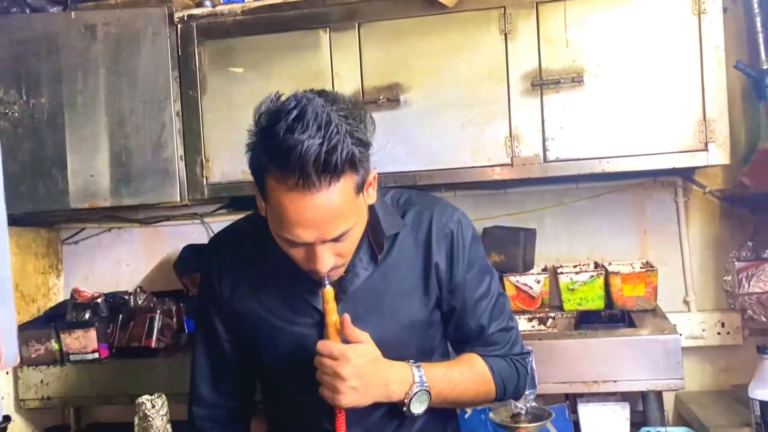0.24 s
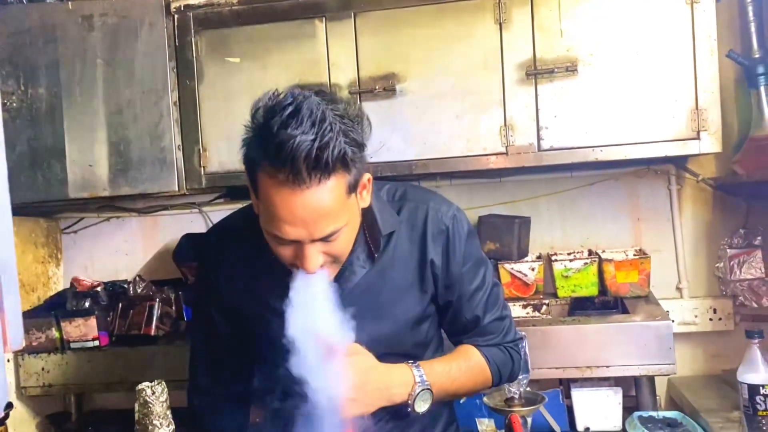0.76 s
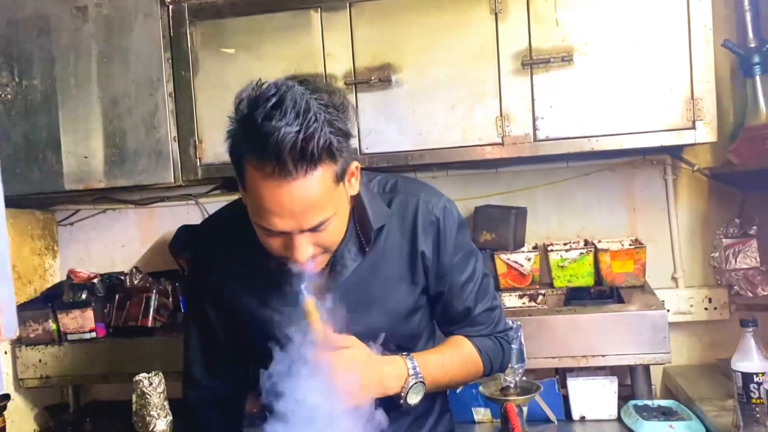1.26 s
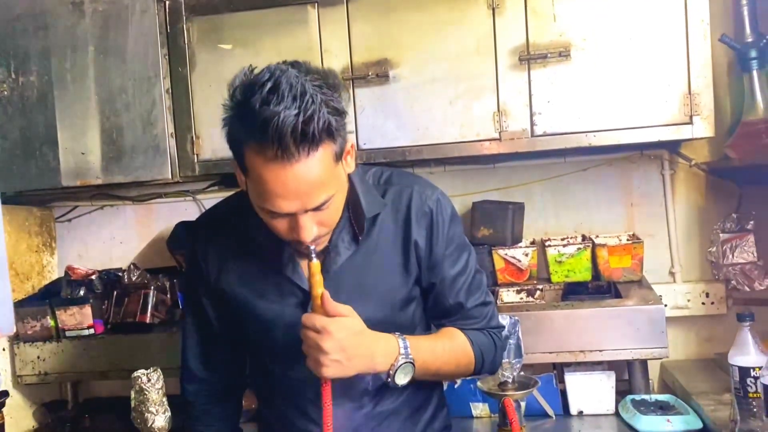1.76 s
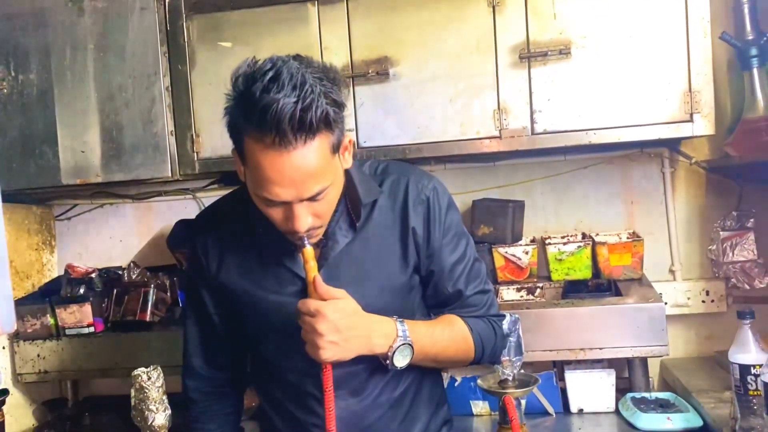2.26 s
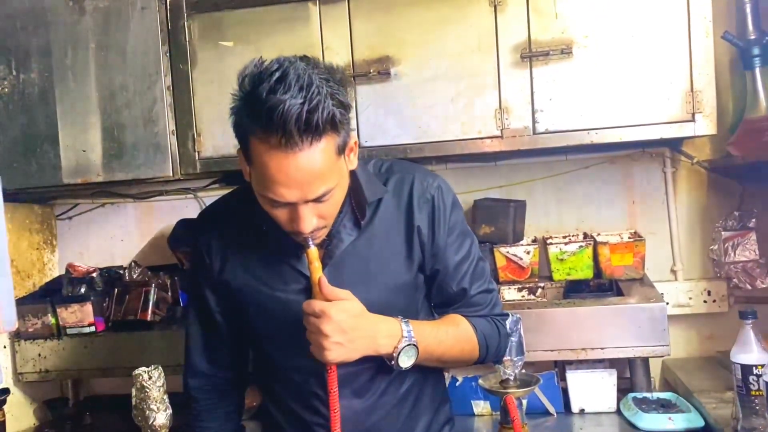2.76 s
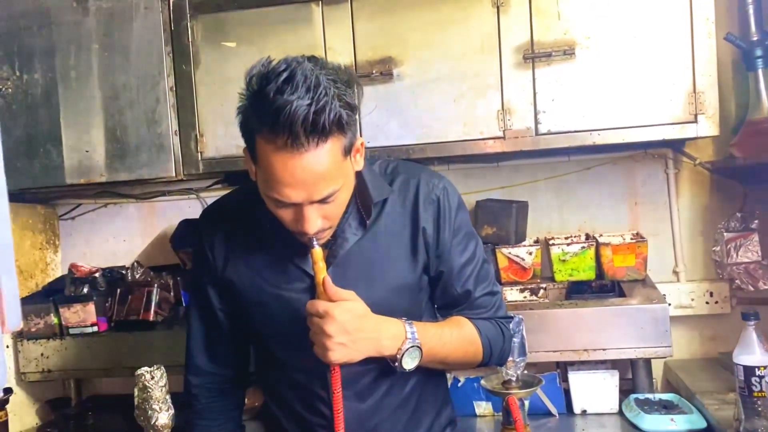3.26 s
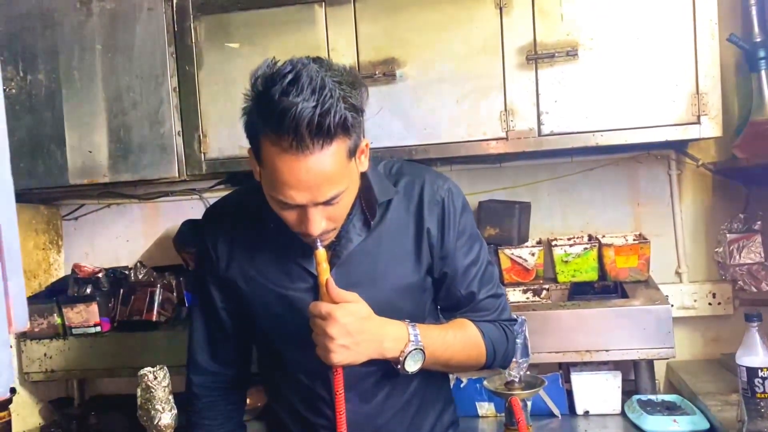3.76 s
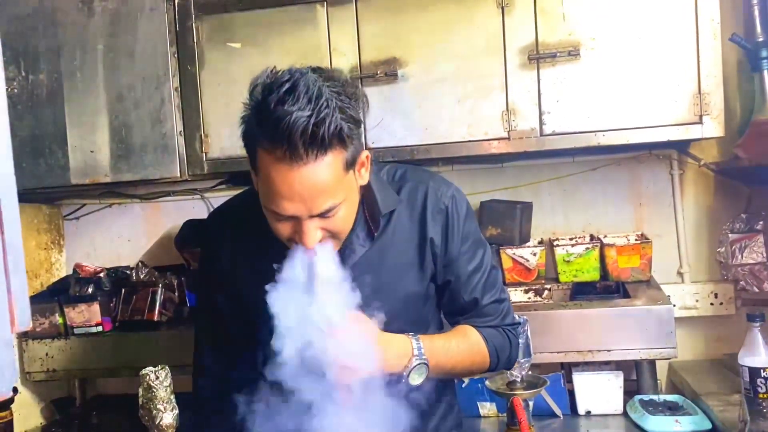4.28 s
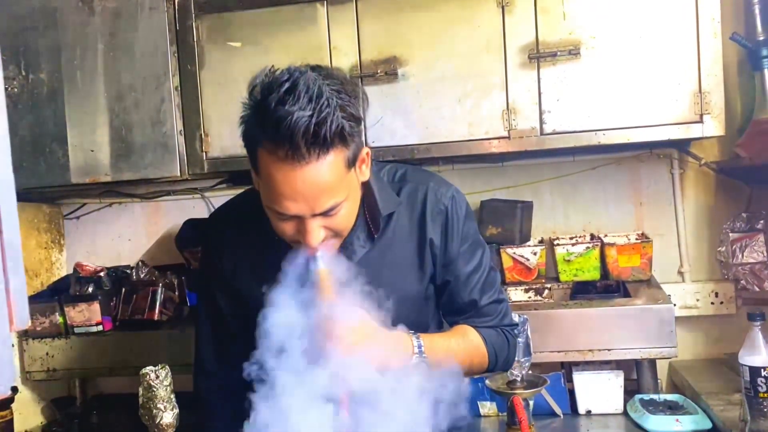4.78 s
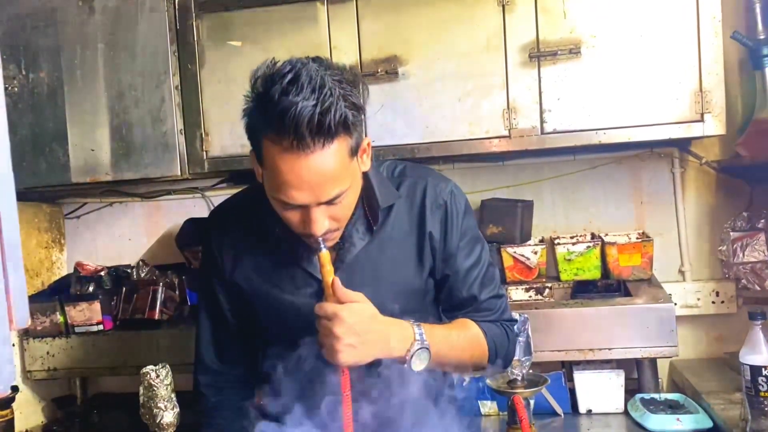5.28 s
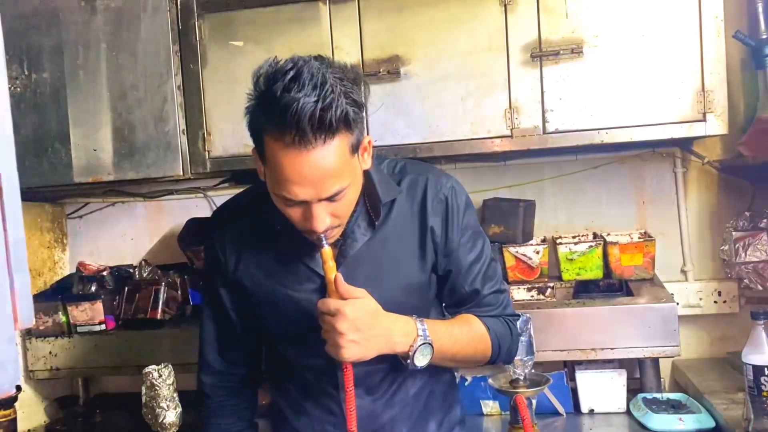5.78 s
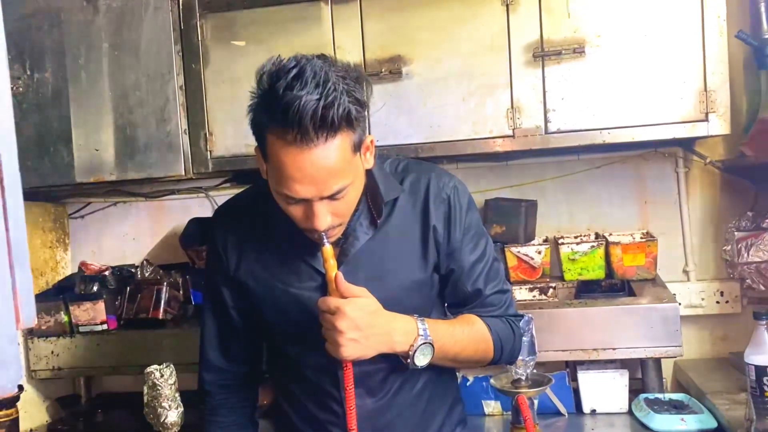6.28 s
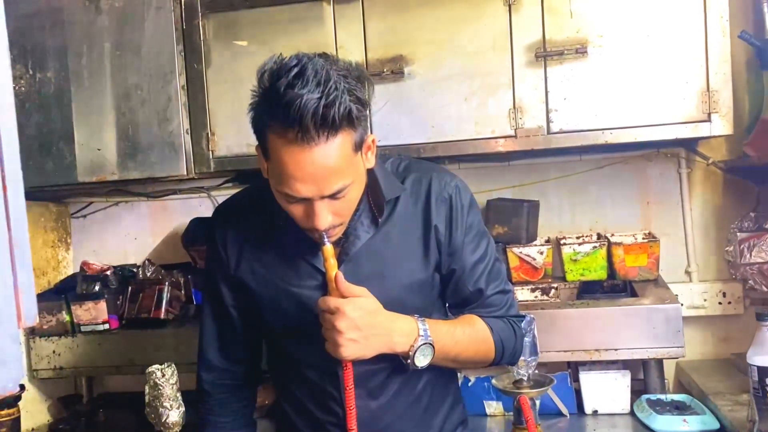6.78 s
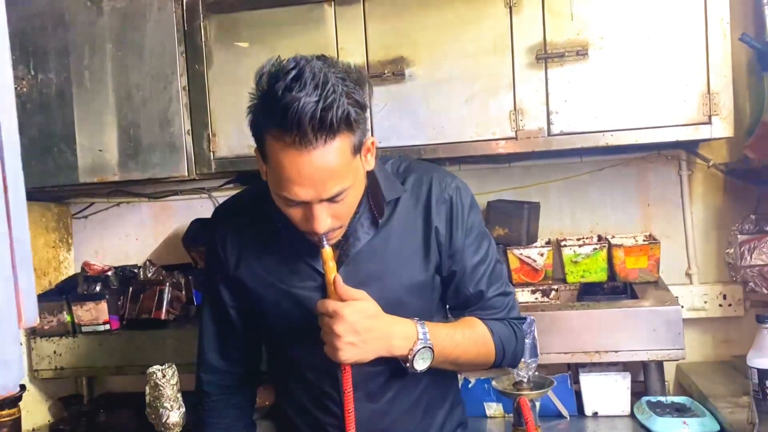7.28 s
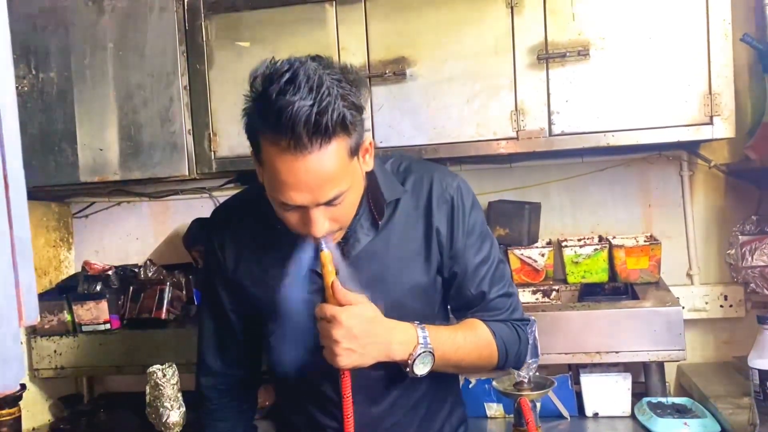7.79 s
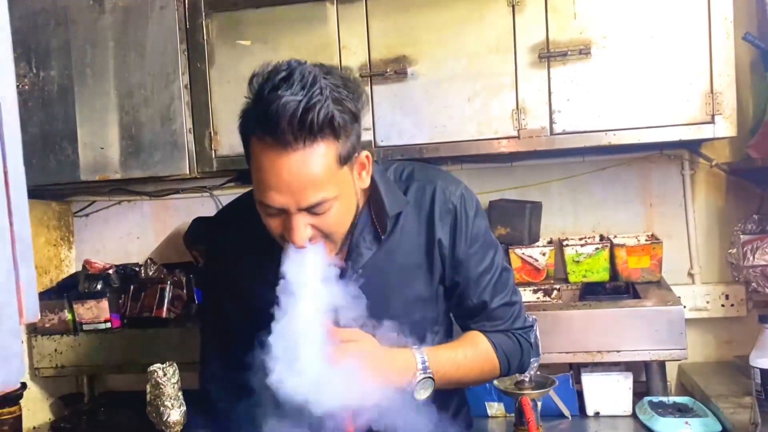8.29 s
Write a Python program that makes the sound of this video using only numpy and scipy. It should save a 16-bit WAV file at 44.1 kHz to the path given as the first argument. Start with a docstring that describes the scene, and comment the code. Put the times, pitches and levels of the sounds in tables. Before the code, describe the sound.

A water pipe is heard close up in a small kitchen, in stereo with a short, diffuse echo. From 0 to 0.5 s the end of a draw gurgles: quick hollow glugs, strongest at first, then weakening. Until about 1.8 s only machinery is left: a low mains-like hum wavering in strength, a deeper motor tone, rumble and a soft fan rush. A tiny airy spurt comes just before the second draw, whose gulps run from 2.0 to 3.8 s, irregular, rounded and wet, more widely spaced towards the end, with faint hiss. The drone stands alone again until 5.2 s. The third draw is longest and densest, about fifteen gulps a second, bubbling with small rising pops and a breathy airflow hiss that fades; a small hard tick lands near 6.26 s. Gulps weaken towards 7.8 s and stop. Hum and fan continue to 8.6 s, with one barely audible tick near 8.4 s.

```python
"""Gurgling water pipe in a kitchen

A water pipe gurgles in a small kitchen during three draws. Gulps of smoke break off the submerged stem:
short volleys of pressure jolts set its air column ringing. Loose bubbles are short rising tones, ticks are
clicks into short resonances, and the hiss of air is faint coloured noise. Machinery drones all along:
a wavering hum, a motor tone and a low tone (sines), rumble and fan (noise). The left side hears later."""
import sys
import numpy as np
from scipy import signal
from scipy.fft import rfft, irfft, next_fast_len
from scipy.io import wavfile

SR = 44100
rng = np.random.default_rng(int(sys.argv[2]) if len(sys.argv) > 2 else 0)


def dump(signal):
    """Clip the signal to [-1, 1] and save it as 16-bit WAV at the path in sys.argv[1]."""
    limited = np.clip(np.atleast_2d(signal).T, -1, 1)
    pcm = np.round(limited * 32767).astype(np.int16)
    wavfile.write(sys.argv[1], SR, pcm)


N = 376589

# the clear gulps leaving the stem: (time [s], level [dB], lift of the modes near 1.2 kHz [dB],
# near 1.9 kHz [dB], near 2.8 kHz [dB], bubble pitch [Hz], strongest mode near 1.2 kHz [Hz],
# strongest mode near 1.9 kHz [Hz], delay of the bubble's song, which also sets the volley's swell [s])
GULPS = [(0.022, -7.5, 7, 7.5, -13, 538, 1246, 1857.0, 0.012),
         (0.098, -7.5, -2.5, -5, -12, 508, 1303.0, 1863.0, 0.016),
         (0.163, -17.5, 10, 0, -10, 506, 1141.0, 2008.0, 0.012),
         (0.262, -17.5, 3, -21, -14, 623, 1007.0, 1475.0, 0.01),
         (0.312, -12, -7, -17, -15, 656, 1330.0, 1534.0, 0.0019),
         (0.354, -13.5, -4, -6, -7, 638, 1020, 1486.0, 0.008),
         (0.425, -13.5, -9, -1.0, -4, 559, 1020, 1642.0, 0.0098),
         (0.474, -18.5, -12, -19.5, -12, 453, 1044.0, 1820.0, 0.0035),
         (2.031, -14.5, 2.5, -2.5, -8.5, 558, 991.0, 1669.0, 0.0087),
         (2.084, -4.5, 6, 1.5, -0.5, 564.6, 1314.0, 1642.0, 0.014),
         (2.146, -14.5, -0.5, -4, -5, 568.0, 1015, 1637.0, 0.0018),
         (2.186, -9.5, 3, 5, 6.5, 547, 1344, 1642.0, 0.014),
         (2.242, -23.5, 4, -2.5, 10, 573, 1297.0, 1820.0, 0.019),
         (2.374, -19.5, -4, -1, 4, 503.0, 1147.0, 1637.0, 0.003),
         (2.506, -12, 7, -2.5, -14, 499, 1320, 1642.0, 0.0092),
         (2.62, -15.5, -2, -1, -8, 532, 1157.0, 1647.0, 0.0091),
         (2.706, -12.5, -1, -15, -5, 545, 1222.0, 1631.0, 0.012),
         (2.741, -18, 7, 8, 8.0, 476, 1030, 1642.0, 0.0017),
         (2.805, -15, 3.5, 4, 0, 457, 1012.0, 1637.0, 0.0069),
         (2.863, -22.5, -16, -15, 1.0, 538, 1087.0, 1744.0, 0.0027),
         (2.926, -20, 3, -2, -2, 520, 1389.0, 1642.0, 0.009),
         (2.967, -8, -8.0, -9.5, -10, 620.6, 1300, 1647.0, 0.016),
         (3.025, -8, 1.5, -2.5, -3, 578, 1290, 1642.0, 0.0066),
         (3.128, -13.5, -0.5, -16, -5.0, 589.0, 970, 1453.0, 0.0046),
         (3.16, -19.5, -1, -4, -9, 601, 1017.0, 1653.0, 0.005),
         (3.209, -12.0, 5.5, 8.5, -8.0, 597, 995, 1642.0, 0.012),
         (3.374, -21.5, 0, -8, 0, 544, 931.0, 1793.0, 0.0023),
         (3.511, -8.5, 5, -3, -13, 636, 1320, 1642.0, 0.016),
         (3.632, -9, -1.5, 5.5, 1, 574.5, 1319.0, 1642.0, 0.014),
         (3.774, -7, 1.5, -4.5, -19, 582, 1314.0, 2003.0, 0.0094),
         (5.237, -9, -2.5, -21, -1, 573, 1180, 1658.0, 0.014),
         (5.322, -13, 7.5, 6, 1, 549, 1012.0, 1647.0, 0.0094),
         (5.357, -11, -8, -18, -5, 547, 1400, 1653.0, 0.017),
         (5.393, -14, 0, 1, -7, 519, 1044.0, 1642.0, 0.011),
         (5.442, -31, 3, 13, 20.0, 504.0, 1217.0, 1825.0, 0.017),
         (5.499, -7.5, -1.5, -0.5, 4, 514, 1012.0, 1647.0, 0.015),
         (5.582, -9.0, 3.5, -5, -11, 611, 1012.0, 1642.0, 0.012),
         (5.622, -10.5, -4, -9, -11.0, 539, 1028.0, 1653.0, 0.0018),
         (5.666, -13.0, 2.5, -0.5, -5, 577, 1314.0, 1653.0, 0.018),
         (5.73, -11, -6.5, -17, -10, 623, 1020, 1647.0, 0.011),
         (5.773, -12.5, -1.5, -13, -8, 537, 1319.0, 1642.0, 0.019),
         (5.839, -6.5, 7.5, -1, -8.5, 556, 1026, 1642.0, 0.029),
         (5.904, -8.5, 1, -18.5, -10, 575, 1310, 1647.0, 0.006),
         (5.987, -13, 7.5, -6, -4, 544, 985, 1637.0, 0.011),
         (6.026, -10.5, -6.0, 1.5, -5.5, 559, 1320, 1637.0, 0.0067),
         (6.095, -11, 0, -15, 1, 537, 1012.0, 1637.0, 0.023),
         (6.206, -7, -8.0, -10.5, -17, 579, 1324.0, 1470.0, 0.013),
         (6.275, -8.5, 1, -1, -5.5, 605, 1290, 1642.0, 0.019),
         (6.333, -12, 1.0, 0.5, 1, 488, 1017.0, 2003.0, 0.019),
         (6.404, -9, -7, -27, -8.5, 569.5, 1034.0, 1674.0, 0.027),
         (6.47, -17, -1, 3.5, -12, 543, 1030, 1642.0, 0.01),
         (6.555, -17.5, -4.5, -2.0, 1.0, 587, 1314.0, 1653.0, 0.002),
         (6.602, -14.5, -2, -12, -5, 543, 1297.0, 1733.0, 0.0029),
         (6.683, -15.5, 2, -16, -6, 477, 1190, 1637.0, 0.0081),
         (6.724, -7.5, 4, -4, -8, 587, 1164, 1647.0, 0.0087),
         (6.804, -17.5, 0, 2, 0.5, 606, 1120, 2024.0, 0.026),
         (6.903, -29, 9, 15.5, 9, 475, 1324.0, 2003.0, 0.023),
         (6.947, -11, 1.0, -1, -18, 591, 1314.0, 1480.0, 0.0056),
         (7.023, -15, 0, -0.5, 8, 569, 1017.0, 1631.0, 0.007),
         (7.122, -10.5, 2, -17.5, -19, 565, 1296, 1486.0, 0.011),
         (7.17, -10, 0, -20, -17, 529, 1420, 1453.0, 0.005),
         (7.212, -21, 4, -1, -6, 493.0, 1023.0, 1626.0, 0.01),
         (7.263, -8.5, 0.5, -2.5, 3.0, 472, 1350, 1642.0, 0.0081),
         (7.353, -12.5, -7, -11, -7, 480, 1006, 1480.0, 0.014),
         (7.401, -10, -14, -13, -9.0, 565, 910.0, 1642.0, 0.0022),
         (7.45, -17, 6, 2.5, -7, 528, 1350, 1475.0, 0.02),
         (7.482, -17.5, 2, -5, -13.0, 570, 1100, 1637.0, 0.0065),
         (7.525, -18, 7, -10, -12, 604, 990, 1497.0, 0.006),
         (7.577, -15, 1, -10, -9, 540, 1040, 2030.0, 0.0048),
         (7.629, -14.5, -10.5, -10.5, -10.5, 568, 1075, 1653.0, 0.0024),
         (7.682, -19.5, 0, 5, 4.5, 543, 1222.0, 1502.0, 0.002),
         (7.743, -21.5, -11.5, 4.5, 5, 549, 974.0, 2024.0, 0.0094),
         (7.783, -14.5, -18.0, -23.5, -12, 464, 1055.0, 1642.0, 0.0037)]
GULP_S, GULP_VARIES = 0.019, 0.17   # typical length of a gulp, its relative spread
JOLTS_PER_S = 2200
BUBBLE_RISE_HZ_PER_S, BUBBLE_SIZE = 7500, 0.065   # climb of the bubble's song, its size next to the jolts
BUBBLE_SWELL_S = 0.0075   # half-width of the bubble's song
PUSH_S, PUSH_SIZE = 0.00028, 0.4   # first soft push: half-width, size next to the jolts


def gulp_volleys():
    """As the neck of air tears, it gives soft pressure jolts while the freed bubble sings a rising pitch."""
    bubble_hz, delay = np.transpose(GULPS)[[5, 8]][:, :, None]
    t = np.arange(round(.08 * SR)) / SR
    shape = (len(GULPS), len(t))
    length = GULP_S * np.exp(GULP_VARIES * rng.standard_normal((len(GULPS), 1)))
    jolts = rng.standard_normal(shape) * (rng.random(shape) < JOLTS_PER_S / SR)
    since = t - delay
    cycles = bubble_hz * t + BUBBLE_RISE_HZ_PER_S * since ** 2 / 2 + rng.random((len(GULPS), 1))
    song = np.sin(2 * np.pi * cycles) * np.exp(-(since / BUBBLE_SWELL_S) ** 2)
    push = np.exp(-(t / PUSH_S - 2) ** 2)
    swell = np.exp(-((t - .002 - 0.62 * delay) / (0.7 * length)) ** 2)
    volleys = (jolts + BUBBLE_SIZE * song + PUSH_SIZE * push) * swell
    return volleys / np.sqrt(np.sum(volleys ** 2, axis=1, keepdims=True))   # equal energy


SMALL_PER_S, BUBBLING_ATTACK_S = 600, 0.22
SPLASH_DB, SPLASH_S = -30.5, 0.022   # wake of small bubbles: level next to its gulp, decay time


def small_bubbling():
    """Tiny random jolts: a bubbling during each draw, plus a dying wake behind each gulp."""
    s, level_db = np.transpose(GULPS)[:2]
    wake, fall = np.zeros(N), np.exp(-1 / (SPLASH_S * SR))
    wake[(s * SR).astype(int)] = amp(level_db + SPLASH_DB)
    wake = signal.lfilter([1], [1, -fall], wake + 1e-18)
    bubbling = per_draw(column=2, attack_s=BUBBLING_ATTACK_S) * amp(2.2 * drift(29.0))
    jolts = rng.standard_normal(N) * (rng.random(N) < SMALL_PER_S / SR)
    return jolts * (bubbling + wake)


# ringing modes of the air column in stem and flask: (pitch [Hz], width [Hz], level [dB],
# left minus right [dB], angle by which left trails [rad])
STEM = [(213, 30, -3.5, -2, 0.5), (445.4, 58, 0, 4.5, 0), (508, 27, -11, 6.5, 1.26),
        (557.4, 84, -2.5, -1, 0.45), (619, 88.5, 2, -8.5, 0), (670, 61, -4, -0.5, -2.05),
        (766, 59, -8.5, -3, -1), (1009.5, 38, -13, 2, -1.26), (1155, 39, -13, -10.5, 6.5),
        (1200, 280, -9.5, -5.5, 2), (1313, 43, -11, -1, 3.5), (1425, 25, -22.5, 0.5, 0),
        (1470, 60, -17, 4, 2.5), (1627.5, 62, -12, -6, -1), (1894, 47, -19, 1.5, -0.6),
        (2007, 25, -23, -4.5, 0), (2210, 56, -20, -4, 2.1), (2915, 130, -17, -2.5, 2.5),
        (3220, 430, -11.5, -1.5, -7)]
# how strongly small bubbles drive the modes: (pitch [Hz], level [dB])
SMALL_COLOUR = [(400, -1.5), (700, -2), (1250, -3), (2000, 4.5), (2900, 2.5)]
BUBBLE_FAVOURS_DB_PER_OCTAVE = 12.5   # low modes far from the bubble's pitch are driven less
UPPER_FAVOURS_DB_PER_OCTAVE = 22   # upper modes far from a gulp's strongest ones are driven less
TREBLE_LAG_S = 0.0036   # the highest modes take this long to come in
SPREAD_DB, SOFT_HZ = 2.5, 2300   # chance spread of mode strength (before its rise with pitch), softening


def gurgle():
    """Gulps and small bubbles ring the stem's air column, a set of two-pole resonances."""
    s, level_db, mid_db, top_db, edge_db, bubble_hz, mid_hz, top_hz, _ = np.transpose(GULPS)
    volleys, small = gulp_volleys(), small_bubbling()
    t = np.arange(volleys.shape[1]) / SR
    # place the volleys, and note which gulp came last and how old it is
    gulps, which, age = np.zeros(N), np.zeros(N, int), np.ones(N)
    for k, start in enumerate((s * SR).astype(int)):
        gulps[start:start + len(t)] += amp(level_db[k]) * volleys[k]
        which[start:] = k
        age[start:start + len(t)] = t
    power, bins_hz = np.abs(rfft(volleys)) ** 2, np.fft.rfftfreq(len(t), 1 / SR)
    strengths, out = rng.standard_normal((len(s), len(STEM))), np.zeros((2, N))
    for k, (hz, width_hz, mode_db, pan_db, trail) in enumerate(STEM):
        # each gulp drives the four groups of modes by its own amounts
        if hz < 800:
            off_octaves = np.minimum(np.abs(np.log2(hz / bubble_hz)), .6)
            lift_db = 3.0 - BUBBLE_FAVOURS_DB_PER_OCTAVE * off_octaves
        elif hz < 2350:
            favoured_hz, base_db = (mid_hz, mid_db + 3.5) if hz < 1450 else (top_hz, top_db + 2.5)
            off_octaves = np.minimum(np.abs(np.log2(hz / favoured_hz)), .2)
            lift_db = base_db - UPPER_FAVOURS_DB_PER_OCTAVE * off_octaves
        else:
            lift_db = edge_db
        # every volley reaches this mode near its set strength, however its jolts happen to fall
        near = 1 / (1 + (2 * (bins_hz - hz) / max(width_hz, 30)) ** 2)
        reach = 1.298 * np.sqrt(power @ near / near.sum())
        strength = amp(lift_db + SPREAD_DB * (1 + hz / 5000) * strengths[:, k]) / reach
        onset = np.minimum(age / TREBLE_LAG_S, 1) if hz > 2350 else 1
        drive = gulps * onset * strength[which] + small * amp(at_hz(SMALL_COLOUR, hz))
        sides = resonate(drive, hz, width_hz, np.array([[-trail], [0]]))
        out += (-1) ** k * sides * amp(mode_db + pan_db * np.array([[.5], [-.5]]))
    # water and glass round the jolts off
    return signal.sosfilt(signal.butter(4, SOFT_HZ, fs=SR, output="sos"), out)


BLIPS_PER_S, BLIP_DB = 60, 10.5   # rate; level of the lowest, strongest blips next to small bubbling
# cycles to twice the age at which a blip is loudest, share by which its pitch climbs over them
BLIP_CYCLES, BLIP_RISE = 9.4, 0.34


def blips():
    """Loose bubbles pop up by chance during the draws, each a short rising tone, quieter if higher."""
    count = round(BLIPS_PER_S * N / SR)
    when, pitch, size = rng.random((count, 3)).T
    hz, t = 420 * 5 ** pitch[:, None], np.arange(round(.05 * SR)) / SR
    age = t * hz / BLIP_CYCLES
    swell = age * np.exp(1 - age * 2) * 420 / hz
    songs = np.sin(2 * np.pi * hz * t * (1 + BLIP_RISE * age / 2)) * swell
    out = np.zeros(N + len(t))
    for k in range(count):
        start = int(when[k] * N)
        out[start:start + len(t)] += amp(BLIP_DB - 9.4 * size[k]) * songs[k]
    return out[:N] * per_draw(column=2, attack_s=BUBBLING_ATTACK_S)


# draws on the hose: (start [s], end [s], small bubbling at start [dB], at end [dB],
# hiss at start [dB], at end [dB])
DRAWS = [(-.5, 0.483, -21.5, -44.5, -64, -74), (1.793, 3.797, -39, -36.5, -70, -62.5),
         (5.197, 7.74, -39, -39, -53.5, -67)]
RELEASE_S = 0.054


def per_draw(column, attack_s):
    """Gain that opens with each draw, runs from its first level to its last and closes again."""
    t, out = np.arange(N) / SR, np.zeros(N)
    for row in DRAWS:
        fade = np.clip(np.minimum((t - row[0]) / attack_s, 1 + (row[1] - t) / RELEASE_S), 0, 1)
        out += amp(np.interp(t, row[:2], row[column:column + 2])) * fade ** 2
    return out


# colour of the hiss: (pitch [Hz], level [dB per Hz])
AIR_COLOUR = [(2500, -40), (3600, 13), (5200, 0), (6800, 8.5), (8500, -3), (11000, 3), (15000, -2.5)]
# short spurts of hiss, some perhaps from lips at the mouthpiece: (time [s], level [dB], hold [s])
SPURTS = [(0.45, -57, 0.01), (1.734, -57.5, 0.011), (2.197, -61.5, 0.025), (2.75, -56.5, 0.12),
          (3.08, -61, 0.016)]
HISS_ATTACK_S, SPURT_RISE_DB_PER_S, SPURT_FALL_DB_PER_S = 0.28, 547, 239.5


def air_hiss():
    """Flickering coloured noise: air in the pipe during the draws, and short spurts of hiss besides."""
    held = [(s, s + hold, db) for s, db, hold in SPURTS]
    spurts = spells(held, SPURT_RISE_DB_PER_S, SPURT_FALL_DB_PER_S)
    flow = per_draw(column=4, attack_s=HISS_ATTACK_S) + spurts
    return flow * amp(2.3 * drift(28)) * coloured(AIR_COLOUR)


# small hard ticks: (time [s], click level [dB], ring pitch [Hz])
TICKS = [(6.2554, -33.5, 4150), (6.2652, -19.5, 3520), (6.2654, -41, 4100), (8.4067, -42, 4030)]
TICK_WIDTH_HZ = 260


def ticks():
    """A click into one short high mode, with a dull knock below it."""
    out = np.zeros(N)
    for s, level_db, hz in TICKS:
        click = amp(level_db) * signal.unit_impulse(SR // 20)
        ring = resonate(click, hz, TICK_WIDTH_HZ) + amp(7.5) * resonate(click, 1600, 1200)
        out[round(s * SR):][:len(ring)] += ring
    return signal.sosfilt(signal.butter(6, 4500, fs=SR, output="sos"), out)


KITCHEN_T60_S, KITCHEN_DB = 0.19, -11.5   # time for the echo to fall 60 dB, its level


def kitchen(x):
    """Diffuse echo: each side through its own decaying noise, duller than the direct sound."""
    t = np.arange(round(.5 * SR)) / SR
    tail = rng.standard_normal((2, len(t))) * amp(-60 * t / KITCHEN_T60_S) * (t > .006)
    tail = signal.lfilter([.4], [1, -.6], tail)
    tail /= np.sqrt(np.sum(tail ** 2, axis=1, keepdims=True))
    return amp(KITCHEN_DB) * signal.fftconvolve(x, tail, axes=1)[:, :N]


# level of the wavering hum: (time [s], level [dB])
HUM = [(0.0, -11.5), (0.16, -25.5), (0.33, -12.5), (0.4, -30.5), (0.45, -20.5), (1.54, -17), (1.59, -27),
       (2.23, -13), (2.31, -25.5), (2.35, -14.5), (3.12, -26.5), (3.16, -12.5), (3.3, -26.5), (3.42, -17),
       (3.69, -29), (3.73, -19.5), (4.02, -19), (4.11, -41), (4.21, -19.5), (4.3, -29), (4.54, -18.5),
       (4.64, -37), (4.99, -10.5), (5.04, -21.5), (5.19, -9), (5.28, -22), (5.37, -12.5), (5.54, -32.5),
       (5.61, -14), (5.68, -26), (5.76, -13), (5.92, -14.5), (6.06, -12), (6.16, -20), (6.33, -14.5),
       (6.49, -27), (6.59, -17.5), (6.75, -27.5), (6.82, -14.5), (6.9, -25.5), (7.02, -17), (7.11, -25),
       (7.49, -16), (7.66, -25), (7.75, -11.5), (7.83, -25.5), (8.06, -12), (8.16, -17), (8.37, -11.5),
       (8.44, -25.5), (8.54, -18)]
HUM_HZ, HUM_SLIP_RAD = 99.6, 0.7   # pitch, how far its phase slips about
HUM_WAVER_HZ, HUM_STEADY = 5, 0.95   # speed of its wavering, share that holds still


def hum():
    """A sine that wavers in level and phase."""
    wander = drift(HUM_WAVER_HZ) + 1j * drift(HUM_WAVER_HZ)
    waver = HUM_STEADY + np.sqrt((1 - HUM_STEADY ** 2) / 2) * wander
    slip = np.exp(1j * HUM_SLIP_RAD * drift(3.0))
    return tone(HUM_HZ, amp(in_time(HUM)) * waver * slip)


# spells in which the motor tone stands out: (start [s], end [s], level [dB]);
# a spell that ends before it starts stays far below its level
MOTOR = [(-.5, 2.65, -24), (3.0, 3.9, -37), (4.75, 3.75, -20.5), (5.75, 7, -26.5), (8.1, 13, -35)]
MOTOR_HZ, MOTOR_IDLE_DB, MOTOR_FADE_DB_PER_S = 66.62, -39, 69.5


def motor():
    """A steady-pitched sine that idles softly and comes forward in spells."""
    return tone(MOTOR_HZ, amp(MOTOR_IDLE_DB) + spells(MOTOR, MOTOR_FADE_DB_PER_S, MOTOR_FADE_DB_PER_S))


# level of the lowest tone, around which it swells: (time [s], level [dB])
LOW_TONE = [(0.0, -38.5), (2.21, -45.5), (3.21, -32.5), (3.59, -48), (3.69, -35.5), (5.23, -31.5),
            (5.42, -46), (5.71, -34), (8.54, -39)]
LOW_HZ = 37.3


def low_tone():
    """A very low sine that swells slowly."""
    return tone(LOW_HZ, amp(in_time(LOW_TONE) + 4.3 * drift(2.0)))


# colour of the rumble: (pitch [Hz], level [dB per Hz])
RUMBLE = [(24, -27.5), (36, -26), (62, -13.5), (78, -16.5), (91, -2.5), (99, -16.5), (110, -13.5),
          (129, -28.5), (142, -22.5), (157, -16.5), (204, -20), (272, -16.5), (325, -23), (509, -28),
          (550, -21), (700, -43.5), (910, -93)]
RUMBLE_DB = -24.5


def rumble():
    """Steady low noise, a little stronger on the left."""
    return amp(RUMBLE_DB) * coloured(RUMBLE) * amp([[.5], [-.5]])


# colour of the fan: (pitch [Hz], level [dB per Hz])
FAN = [(380, -28.5), (650, 5), (800, 7.5), (1000, 5.5), (1310, -4), (1650, -6.5), (2000, -9), (2150, -15),
       (3050, -24.5), (4200, -29), (5300, -39), (6500, -34), (9000, -46), (12000, -42), (15000, -58)]
FAN_DB = -37.5


def fan():
    """Steady rushing noise, a little stronger on the right."""
    return amp(FAN_DB) * coloured(FAN) * amp([[-.6], [.6]])


# how alike left and right noise are: (pitch [Hz], likeness [0 to 1])
LIKENESS = [(60, 0.79), (180, 0.88), (300, 0.88), (520, 0.83), (1000, 0.14), (3000, 0.36), (12000, 0.45)]


def coloured(spectrum):
    """Stereo noise of a given spectrum, the two sides most alike in the bass; rms 1."""
    size = next_fast_len(N)
    hz = np.fft.rfftfreq(size, 1 / SR)
    mid, side = rfft(rng.standard_normal((2, size))) * amp(at_hz(spectrum, hz))
    alike = at_hz(LIKENESS, hz)
    both = np.sqrt(1 + alike) * mid + np.sqrt(1 - alike) * side * [[1], [-1]]
    return rms_one(irfft(both, size)[:, :N])


def tone(hz, gain):
    """A sine of rms 1 under a gain whose angle, if any, shifts its phase."""
    turns = hz * np.arange(N) / SR + rng.random()
    return np.sqrt(2) * np.real(gain * np.exp(2j * np.pi * turns))


def resonate(x, hz, width_hz, phase=0):
    """Two-pole resonance; a unit click rings at height 1 from the given phase (one row per phase)."""
    r, w = np.exp(-np.pi * width_hz / SR), 2 * np.pi * hz / SR
    rung = signal.lfilter([1], [1, -2 * r * np.cos(w), r * r], x + 1e-18)
    return np.sin(phase) * rung + r * np.sin(w - phase) * np.append(0, rung[:-1])


def drift(rate):
    """Slow chance wandering, spread 1; made at every 40th sample, then joined by lines."""
    r = np.exp(-80 * np.pi * rate / SR)
    noise = rng.standard_normal(N // 40 + 2002)
    slow = signal.lfilter([1], [1, -2 * r, r * r], noise)[2000:]
    return np.interp(np.arange(N) / 40, np.arange(len(slow)), rms_one(slow))


def spells(rows, rise_db_per_s, fall_db_per_s):
    """Gain that climbs to each (start, end, dB) spell, holds and falls away."""
    t, out = np.arange(N) / SR, np.zeros(N)
    for start, end, db in rows:
        rise = rise_db_per_s * np.maximum(start - t, 0)
        fall = fall_db_per_s * np.maximum(t - end, 0)
        out += amp(db - rise - fall)
    return out


def in_time(rows):
    """Straight lines between (time, value) points."""
    s, values = np.transpose(rows)
    return np.interp(np.arange(N) / SR, s, values)


def at_hz(points, hz):
    """Straight lines between (Hz, value) points on a logarithmic pitch scale."""
    points_hz, values = np.transpose(points)
    return np.interp(np.log(hz + 1e-9), np.log(points_hz), values)


def amp(db):
    """Decibels to a plain factor."""
    return 10 ** (np.asarray(db) / 20)


def rms_one(x):
    """Scale to an rms of 1."""
    return x / np.sqrt(np.mean(x ** 2) + 1e-20)


def scene():
    """The pipe and its echo in the kitchen, the hiss, and the machinery behind."""
    pipe = gurgle() + blips() + ticks()
    drone = (hum() + motor() + low_tone()) * amp([[.3], [-.3]])
    return pipe + kitchen(pipe) + air_hiss() + drone + rumble() + fan()


# how much later the left microphone port hears: (pitch [Hz], lag [samples])
PORT_LAG = [(100, 3.7), (250, 4.7), (600, 21.3)]
CUTOFF_HZ = 15750


def record(dry):
    """The right port is nearer to everything, so the left hears later; the top is cut."""
    left = np.pad(dry[0], 2048, "reflect")
    size = next_fast_len(len(left))
    hz = np.fft.rfftfreq(size, 1 / SR)
    delay = np.exp(-2j * np.pi * hz * at_hz(PORT_LAG, hz) / SR)
    late = irfft(rfft(left, size) * delay, size)[2048:2048 + N]
    top_cut = signal.cheby2(12, 70, CUTOFF_HZ, fs=SR, output="sos")
    return signal.sosfilt(top_cut, np.array([late, dry[1]]))


dry = scene()
out = record(dry)
dump(out)
```